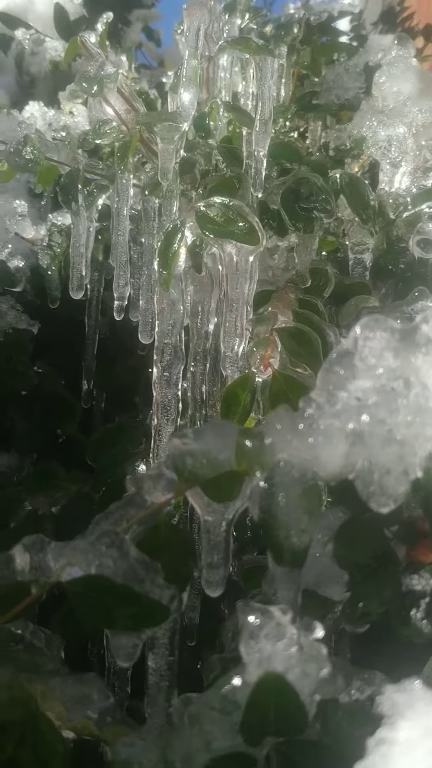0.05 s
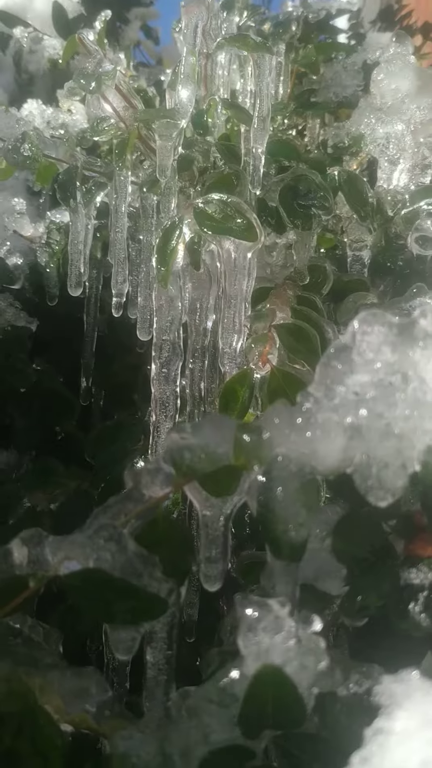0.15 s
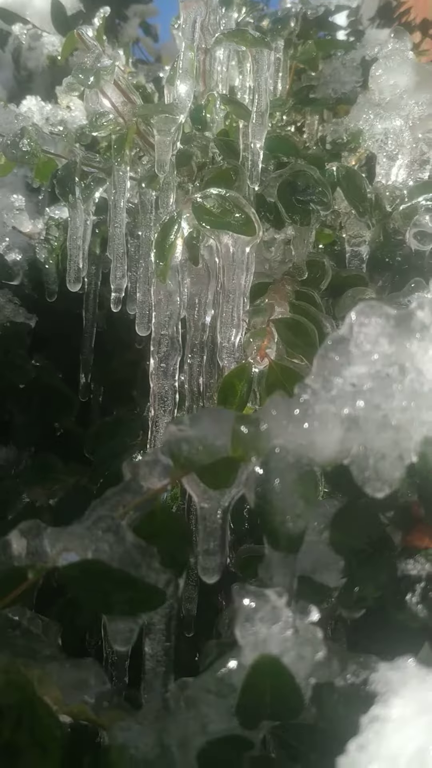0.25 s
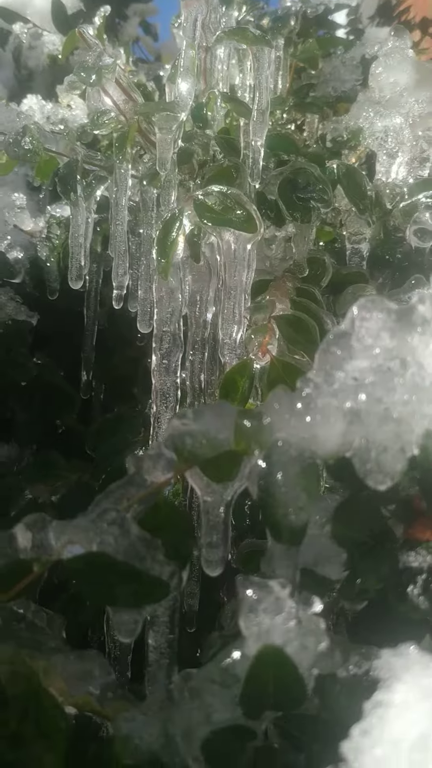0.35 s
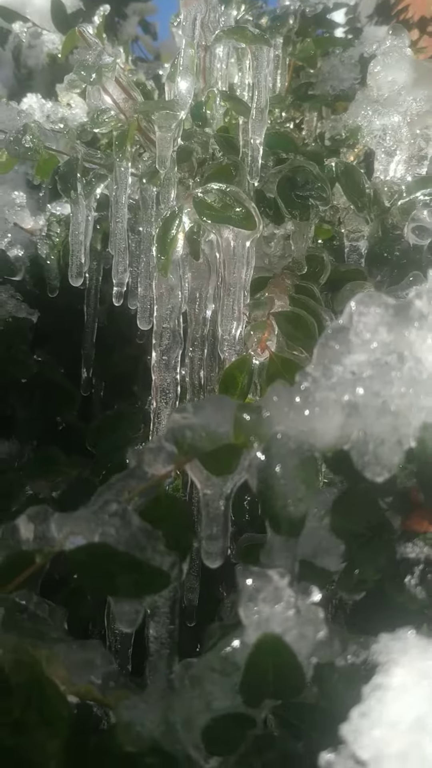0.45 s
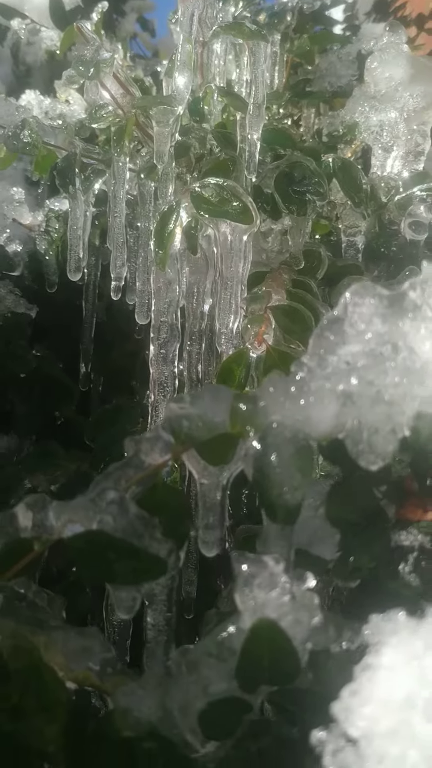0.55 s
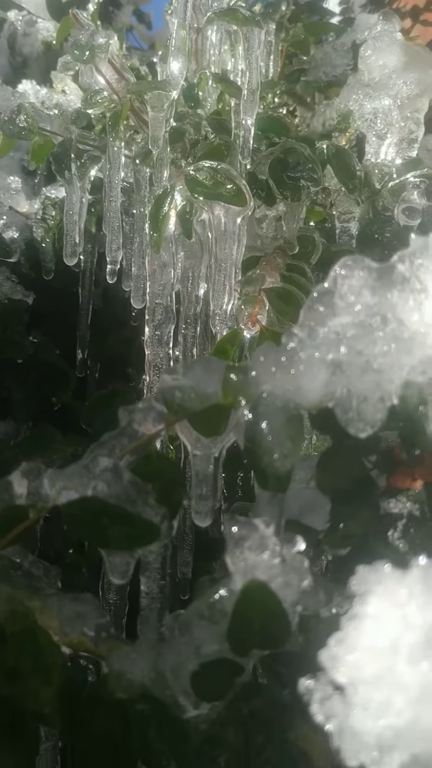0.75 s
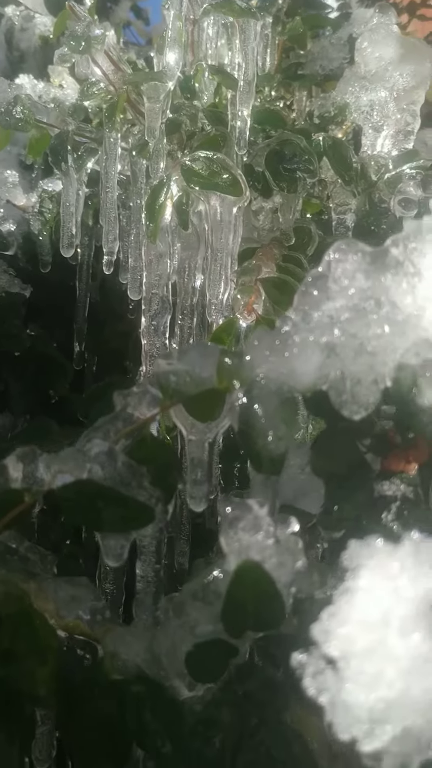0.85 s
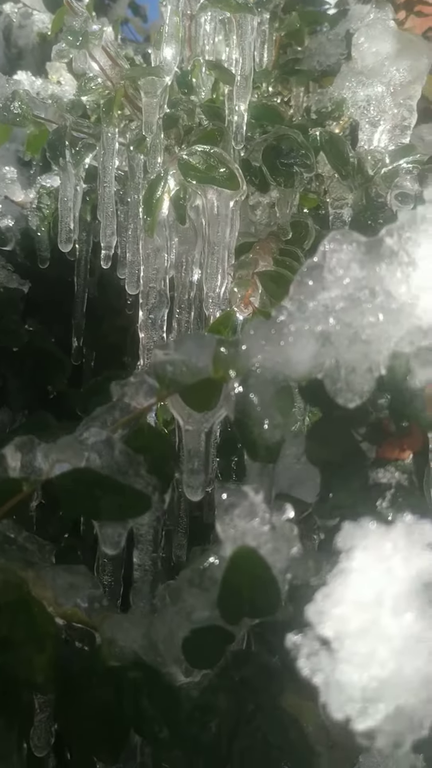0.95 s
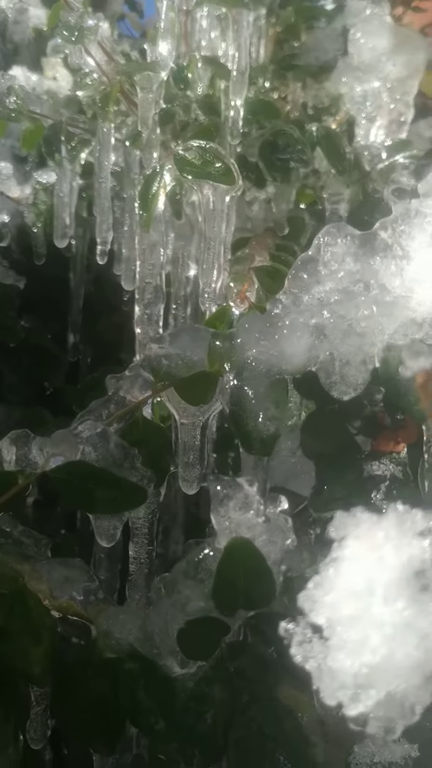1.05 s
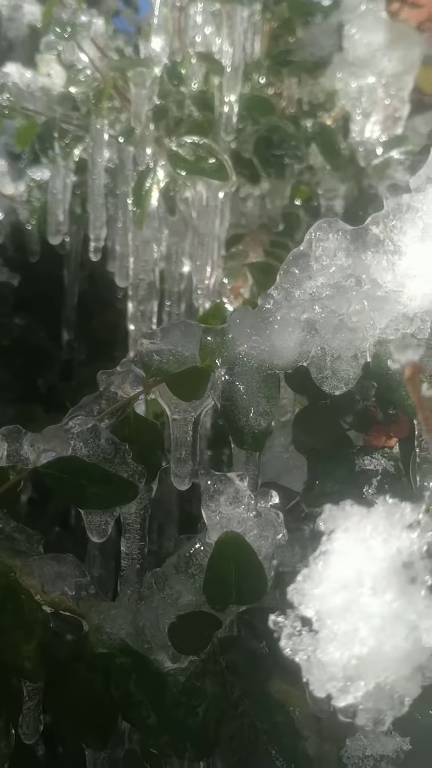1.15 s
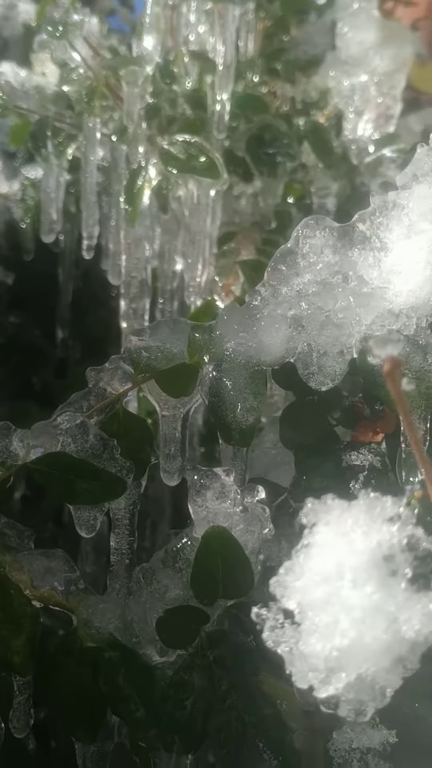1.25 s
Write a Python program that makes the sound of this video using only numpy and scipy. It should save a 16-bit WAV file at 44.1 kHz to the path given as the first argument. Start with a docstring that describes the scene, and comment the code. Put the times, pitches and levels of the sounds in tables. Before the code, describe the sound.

Icy leaves brush the microphone in short gritty strokes, with ticks and one sharp pop.

```python
"""An icy garden, over a low rumble of wind and a faint hiss of air. A finger brushes the left microphone of a
hand-held camera in short gritty strokes made of tiny slips, with sharp ticks, glassy tinks and one tiny squeak.
The right microphone pops once: a sudden step that drains away through the recorder's bass cut."""
import sys
import numpy as np
from scipy import signal
from scipy.fft import rfft, irfft
from scipy.io import wavfile
from scipy.ndimage import uniform_filter1d

SR = 44100
rng = np.random.default_rng(int(sys.argv[2]) if len(sys.argv) > 2 else 0)


def waveform_to_disk(signal):
    """Save audio, clipped to [-1, 1], as 16-bit WAV at the path in sys.argv[1]."""
    frames = np.transpose(np.atleast_2d(signal))
    scaled = np.clip(frames, -1, 1) * 32767
    samples = np.round(scaled).astype(np.int16)
    wavfile.write(sys.argv[1], SR, samples)


N = 57330
TIME = np.arange(N) / SR


def amp(db):
    return 10 ** (np.asarray(db) / 20)


def unit(x):
    """Scales to rms 1."""
    return x / np.sqrt(np.mean(x ** 2) + 1e-20)


def colour(x, curve):
    """Shapes a sound with an EQ curve, keeping the power of white noise."""
    hz, db = np.transpose(curve)
    gain = amp(np.interp(np.log(np.fft.rfftfreq(N, 1 / SR) + 1), np.log(hz + 1), db))
    return irfft(rfft(x) * unit(gain), N)


def noise(curve):
    """Steady noise with the given EQ, at rms 1."""
    return unit(colour(rng.standard_normal(N), curve))


def envelope(start, attack, decay):
    """A straight attack, then a tail that falls to 1/e in each decay time."""
    age = TIME - start
    return np.clip(age / attack, 0, 1) * np.exp(-np.maximum(age - attack, 0) / decay)


# The wind's rumble and the air on each side. Each row: frequency in Hz, relative level in dB.
RUMBLE_EQ = [(8, -4), (25, 1), (45, 2.5), (82, -14), (120, -8), (170, -13.5), (210, -26), (400, -28.5),
             (800, -33), (2000, -50.5), (5000, -82)]
AIR_LEFT_EQ = [(20, 15), (100, 8), (300, -4), (700, -5.5), (1400, -2), (2400, -10.5), (4500, -17.5),
               (9000, -15), (16000, -18)]
AIR_RIGHT_EQ = [(20, 16.5), (100, -1.5), (300, -3.5), (700, -15), (1400, -8.5), (2400, -15), (4500, -19),
                (9000, -20.5), (16000, -17.5)]

def wind():
    """The bed: a low rumble shared by both microphones, and a faint hiss of air, separate on each."""
    air = np.array([amp(-56) * noise(AIR_LEFT_EQ), amp(-57.5) * noise(AIR_RIGHT_EQ)])
    return amp(-44) * noise(RUMBLE_EQ) + air


# Glassy tinks. Each row: start in seconds, pitch in Hz, level in dB, decay in seconds.
GLASSY_TINKS = [(0.1725, 7400, -40, 0.0045), (0.2233, 3220, -52, .003), (0.3010, 5780, -52, .005),
                (0.4051, 9180, -47, 0.0038), (0.479, 9000, -54.5, 0.0026), (0.7260, 3340, -53, 0.012),
                (1.274, 5280, -46, .003), (1.2765, 11360, -44, .004)]

def tinks():
    """Small hard pieces ring for a moment, their pitch unsteady."""
    attack_s, linewidth_hz = 0.0011, 700
    out = np.zeros(N)
    for start, hz, db, decay in GLASSY_TINKS:
        phase_drift = np.cumsum(rng.standard_normal(N)) * np.sqrt(2 * np.pi * linewidth_hz / SR)
        ring = np.sqrt(2) * np.sin(2 * np.pi * hz * TIME + phase_drift)
        out += amp(db) * envelope(start, attack_s, decay) * ring
    return out


# The contact's bright fizz and duller body. Each row: frequency in Hz, relative level in dB.
FIZZ_EQ = [(300, -21), (2500, -17), (4400, -9), (5800, -3.5), (8000, -1), (11500, 0), (14000, 0),
           (16000, -3)]
BODY_EQ = [(100, -7), (400, -1), (1000, -0.5), (1800, 1), (2600, -6), (3400, -0.5), (4400, -6.5),
           (7000, -11.5)]
# Sharp ticks. Each row: start in seconds, peak before EQ in dB, decay in seconds,
# body relative to fizz in dB.
SHARP_TICKS = [(0.0440, -36.5, .0015, -14), (0.0680, -39, .001, -16), (0.1334, -36, 0.00036, -26),
               (0.1643, -28.5, 0.00036, -3.5), (0.1746, -30, 0.00049, -13), (0.705, -34.5, .0006, -18),
               (0.7152, -29, .0005, -16), (0.7856, -29.5, 0.0013, -23), (1.2763, -31.5, 0.001, -16)]

def ticks():
    """Single larger snaps, each a very short bright burst with some body."""
    fizz, body = np.zeros((2, N))
    for start, db, decay, body_db in SHARP_TICKS:
        burst = rng.standard_normal(N) * (TIME >= start) * np.exp(-abs(TIME - start) / decay)
        burst = amp(db) * burst / abs(burst).max()
        fizz += burst
        body += amp(body_db) * burst
    return colour(fizz, FIZZ_EQ) + colour(body, BODY_EQ)


def squeak():
    """One quick, slightly raspy slip whistles upward in a few milliseconds."""
    start_s, length_s, from_hz, to_hz = 0.0983, 0.00321, 5600, 16000
    progress = np.clip((TIME - start_s) / length_s, 0, 1)
    hz = from_hz * (to_hz / from_hz) ** progress
    whistle = np.sin(2 * np.pi * np.cumsum(hz) / SR)
    rasp = 0.2 * noise(FIZZ_EQ)
    return amp(-31) * np.sin(np.pi * progress) * (whistle + rasp)


def grit():
    """Dense micro-slips of uneven size over a smooth hiss, juddering as the contact catches."""
    slips_per_s, spread_db, hiss_share = 5000, 3.5, 0.36
    judder_db, judder_s = 2.25, 0.00091
    sizes = amp(spread_db * np.minimum(rng.exponential(1, N), 4))
    slips = unit(sizes * rng.choice([-1., 1.], N) * (rng.random(N) < slips_per_s / SR))
    judder = unit(uniform_filter1d(rng.standard_normal(N), int(judder_s * SR)))
    texture = np.sqrt(1 - hiss_share) * slips + np.sqrt(hiss_share) * rng.standard_normal(N)
    return unit(texture * amp(judder_db * judder))


# The soft low push under each stroke. Each row: frequency in Hz, relative level in dB.
PUSH_EQ = [(20, -10), (50, 15), (120, -4.5), (250, -14.5), (500, -22), (1200, -34)]
# Strokes across the microphone. Each row: start, attack and decay in seconds, left fizz level in dB,
# body relative to fizz in dB, right side relative to left in dB.
BRUSH_STROKES = [(0.000, 0.0023, 0.028, -51.5, -22, -19), (0.043, 0.015, .034, -47, -11.5, -24),
                 (0.100, .002, 0.0092, -45, -4.5, -19), (0.120, .004, .010, -51.5, -9.5, -22),
                 (0.129, 0.0015, 0.033, -45, -13, -27), (0.162, 0.0016, .006, -49, -3, -25),
                 (0.171, 0.003, 0.012, -39.5, -13, -27), (0.213, 0.0069, .004, -59, -2, 1),
                 (0.240, 0.012, 0.16, -60, -4, -26), (0.294, 0.01, 0.012, -43, -13.5, -16),
                 (0.362, 0.024, 0.024, -56.5, -22, -25), (0.478, .002, 0.0035, -55, -22, -18),
                 (0.541, 0.0034, .005, -55, -16, -20), (0.648, 0.0087, 0.011, -58.5, -14, -20),
                 (0.695, 0.0038, 0.019, -42.5, -13.5, -23), (0.714, .003, 0.017, -42.5, -16, -28),
                 (0.724, 0.0063, 0.035, -51.5, -5.5, -14), (0.761, 0.0035, .012, -46.5, -16, -16),
                 (0.777, .004, 0.011, -47.5, -6.5, -18), (0.784, .002, 0.015, -42, -16, -17),
                 (0.812, .003, 0.0083, -48, -16, -20), (0.821, 0.0035, 0.013, -52, -5, -16),
                 (0.847, 0.0033, 0.033, -55.5, -9, -13), (1.064, 0.0023, 0.0072, -55, -4, -22),
                 (1.104, .003, .004, -60, -14, -20), (1.215, 0.0091, .008, -55, -5, -22),
                 (1.226, 0.0055, 0.0047, -51.5, -3, -13), (1.2733, 0.0049, 0.011, -39.5, -16.5, -10),
                 (1.288, 0.0099, .030, -52, -21, -13)]

def brushing():
    """Each stroke swells and dies away: fizz and body mostly on the left, a low push only there."""
    fizz_power, body_power = np.zeros((2, 2, N))
    for start, attack, decay, db, body_db, right_db in BRUSH_STROKES:
        power = (envelope(start, attack, decay) * amp([[db], [db + right_db]])) ** 2
        fizz_power += power
        body_power += power * amp(body_db) ** 2
    fizz_level, body_level = np.sqrt(fizz_power), np.sqrt(body_power)
    push = amp(-2.5) * colour(fizz_level[0] * rng.standard_normal(N), PUSH_EQ)
    rub = np.array([fizz * colour(grit(), FIZZ_EQ) + body * colour(grit(), BODY_EQ)
                    for fizz, body in zip(fizz_level, body_level)])
    rub[0] += push
    return rub


def pop():
    """A small step, then a large one that crackles and creeps higher; two slow bass cuts drain it."""
    start_s, lead_s, lead_share = 0.22933, 0.00034, 0.19
    creep_s, crackle_s, drain_hz = 0.004, 0.00044, 3.4
    age = TIME - start_s
    after, begun = np.maximum(age, 0), age >= -lead_s
    step = lead_share * begun + (1 - lead_share) * (age >= 0)
    creep = 0.2 * (1 - np.exp(-after / creep_s))
    crackle = amp(-27.5) * noise(FIZZ_EQ) * begun * np.exp(-after / crackle_s)
    b, a = signal.butter(1, drain_hz, "high", fs=SR)
    return amp(-3) * signal.lfilter(b, a, signal.lfilter(b, a, step + creep + crackle))


def scene():
    """Wind and brushing on both sides; ticks, tinks and squeak on the left, the pop on the right."""
    return wind() + brushing() + np.array([ticks() + tinks() + squeak(), pop()])


def record(dry):
    """The recorder's band limit: a steep high cut."""
    high_cut_hz = 16200
    taps = signal.firwin(255, high_cut_hz, window=("kaiser", 9), fs=SR)
    return signal.oaconvolve(dry, taps[None], "same")


dry = scene()
out = record(dry)
waveform_to_disk(out)
```